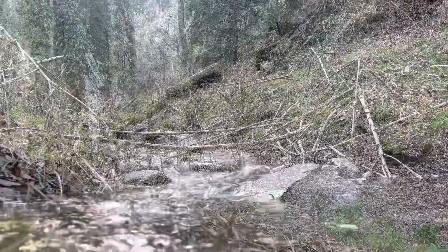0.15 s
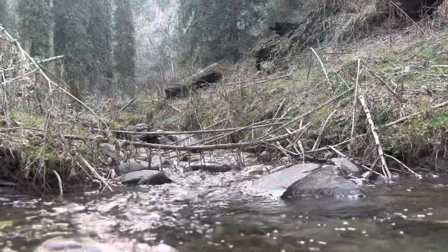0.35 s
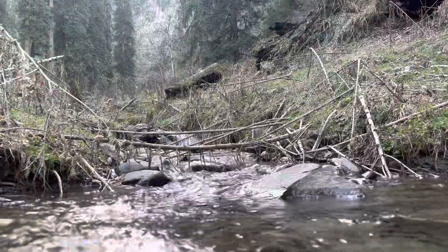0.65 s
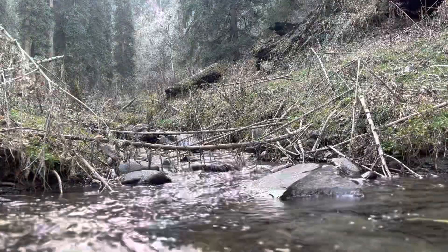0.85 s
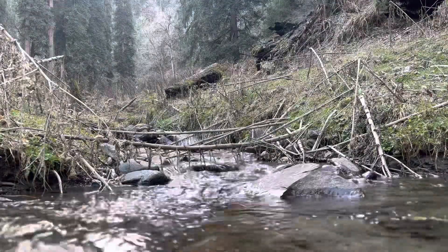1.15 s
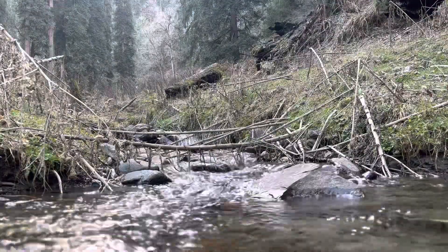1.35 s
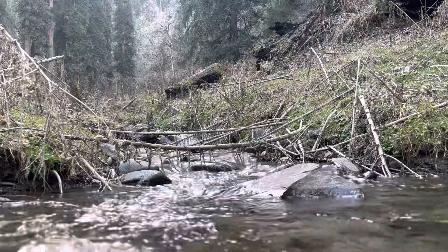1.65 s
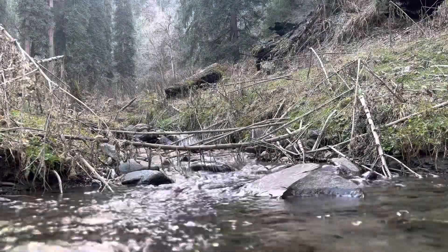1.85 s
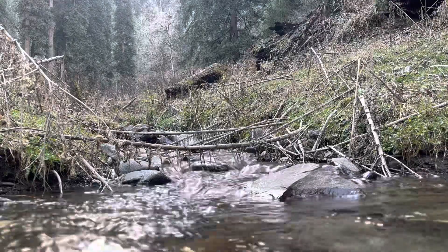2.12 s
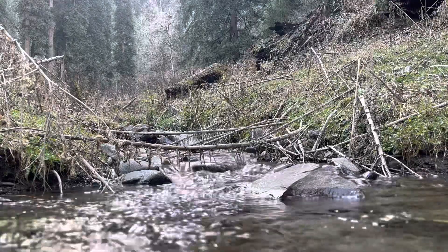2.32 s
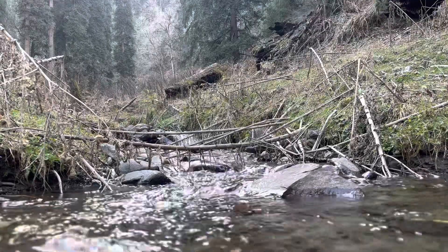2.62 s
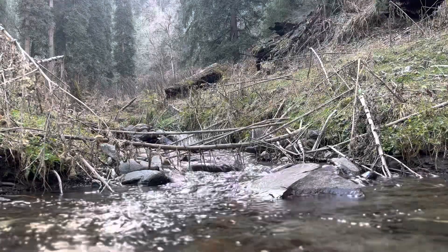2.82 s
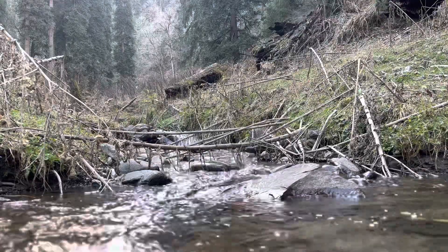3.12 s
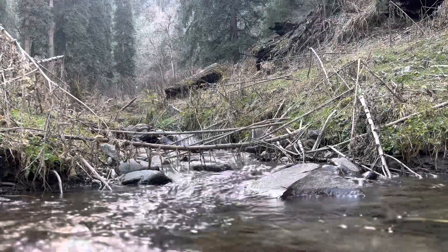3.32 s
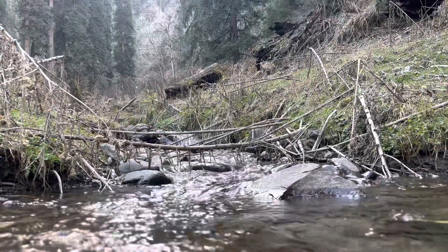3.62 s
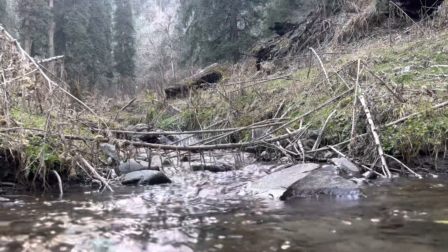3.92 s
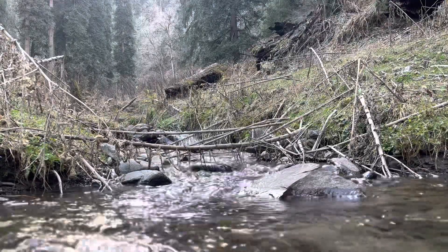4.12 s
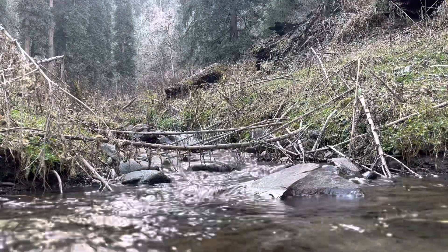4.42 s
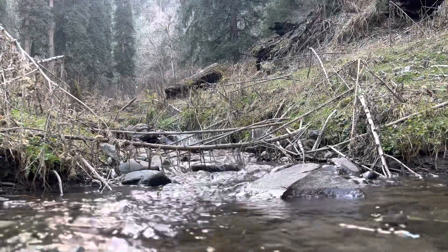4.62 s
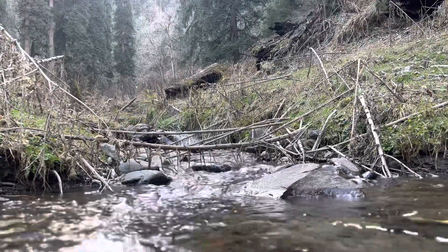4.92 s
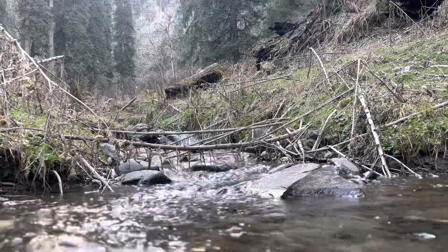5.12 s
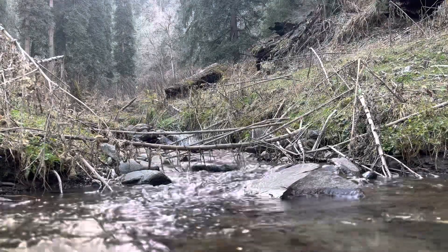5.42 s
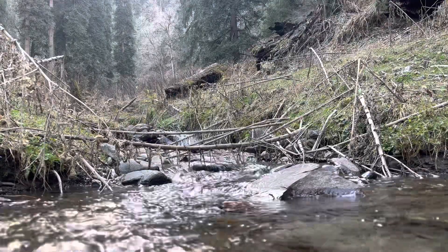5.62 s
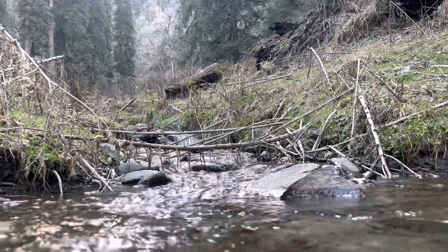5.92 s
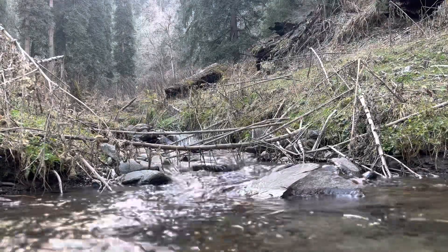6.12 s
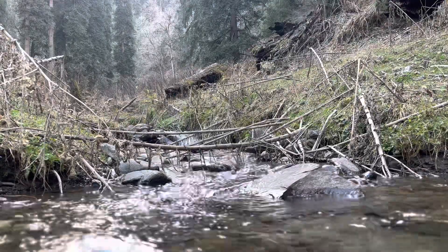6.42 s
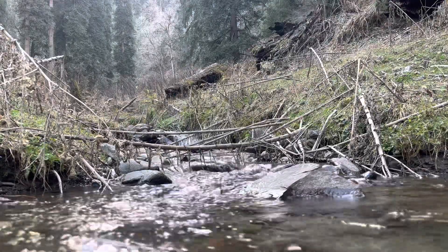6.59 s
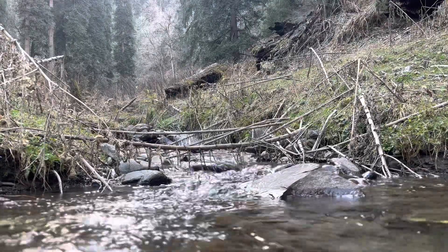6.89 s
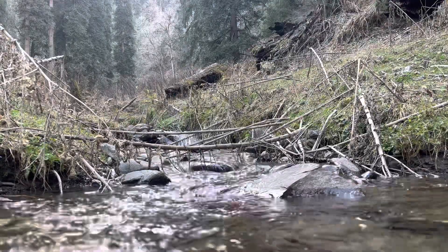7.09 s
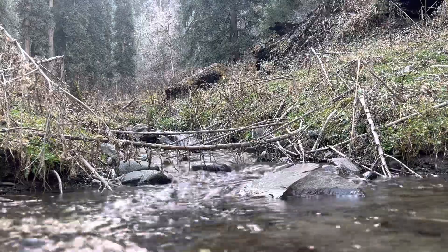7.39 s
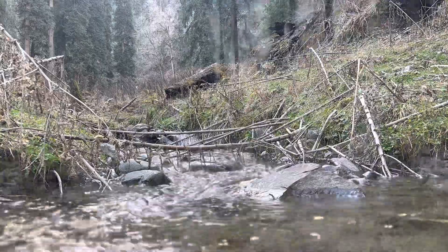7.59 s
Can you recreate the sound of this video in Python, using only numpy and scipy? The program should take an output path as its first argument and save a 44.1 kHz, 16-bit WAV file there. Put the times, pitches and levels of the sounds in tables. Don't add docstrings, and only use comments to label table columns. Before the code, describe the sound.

A shallow stream pours over rocks in a forest, captured within arm's reach by a small stereo microphone. Throughout, a low, soft wash of farther water sits under a dense fizz of tiny ringing bubbles and fine spray. It begins slightly subdued, rises over the first half second, then slowly fills out until about 5.5 s and stays steady. Isolated plops and drips come early, with a slap at 1.2 s. From 2.5 to 3.3 s it becomes busier: popping bubbles, a deep gulp near 2.9 s, small surges and a slap. Plops crowd around 4.4-4.9 s, mostly left. At 6.1 s the largest hollow plop bursts on the left, overloading briefly. A quick splashy surge hits stone at 6.85 s, then bright drips near 7 s and final plops at 7.6-7.7 s. Short rocky echoes surround the close sounds, and the flow continues to the end.

```python
import sys
import numpy as np
from scipy import signal
from scipy.fft import rfft, irfft
from scipy.io import wavfile
from scipy.ndimage import uniform_filter1d

SR = 44100
rng = np.random.default_rng(int(sys.argv[2]) if len(sys.argv) > 2 else 0)


def generate_wav(sig):
    pcm = np.round(np.clip(np.atleast_2d(sig).T, -1, 1) * 32767).astype(np.int16)
    wavfile.write(sys.argv[1], SR, pcm)


def volts(x):
    e = np.asarray(x, float) / 20
    return 10 ** e


N = 341775

# frequency in Hz, level in dB per Hz.
BUBBLE_COLOUR = [(200, -35), (400, 0.5), (800, 0), (1150, -3), (2000, -11), (2700, -8.5), (5000, -20.5),
                 (7500, -26), (10500, -29.5), (13000, -41), (15500, -52)]
# start in seconds, peak in dB, pitch in Hz, left over right in dB.
PLOPS = [(1.336, -13.5, 1426, 8), (1.882, -17.5, 1104, 13), (2.672, -20, 1070, 3), (4.278, -19, 1165, -2),
         (4.381, -22, 1000, 0), (4.395, -19.5, 1115, 8), (4.424, -18, 1203, 7), (4.497, -9.5, 1430, 16.5),
         (4.571, -20, 1380, 14), (4.601, -13.5, 1140, 12), (5.217, -21, 1210, 10), (5.488, -16, 1310, 5),
         (5.508, -21, 1200, 5), (6.641, -18.5, 1565, 11), (6.732, -15, 980, 10), (7.094, -25, 818, -13),
         (7.144, -23, 1004, -7), (.572, -20, 1140, 3), (2.251, -25, 1140, -5)]
# start in seconds, peak in dB, pitch in Hz, left over right in dB.
BIG_PLOPS = [
    (6.131, 2, 1145, 15),
]
# start in seconds, peak in dB, pitch in Hz, left over right in dB.
BLIPS = [(0.58, -18, 1620, 10), (2.319, -20, 900, 4), (2.506, -17, 1130, 2), (2.621, -28, 1030, 16),
         (2.728, -21, 1120, -6), (2.865, -16.5, 740, 2), (3.033, -21, 1187, 16), (3.234, -13, 1300, -1),
         (3.282, -15, 1210, 12), (3.801, -21.5, 980, 0), (4.181, -16, 1187, 7), (4.694, -11, 1770, 3),
         (4.727, -25, 1250, 9), (4.743, -22, 940, 11), (4.808, -19, 1247, -3), (5.072, -17.5, 1076, 6),
         (5.297, -15.5, 1180, 7), (5.787, -20.5, 1234, 9), (6.101, -15, 2350, -5), (6.784, -19, 1110, -15),
         (3.368, -18, 1100, -4), (7.552, -22, 1170, -15), (7.569, -11, 1560, 3), (7.695, -10.5, 1145, 1),
         (4.4, -19, 2450, 2), (4.422, -22, 2080, 0), (4.5605, -23, 1820, 1), (4.608, -18, 1820, -3),
         (3.559, -24, 2010, -2), (3.6616, -17, 2330, .5), (3.796, -24, 1840, -5), (5.951, -20, 1700, -2),
         (6.265, -25, 2090, -8), (6.36, -20, 1700, 1.5), (.917, -22, 1690, -1), (5.175, -25, 1740, 1.5),
         (5.046, -19, 2550, -2), (5.15, -21, 1050, 3)]


def evened(x):
    return x / np.sqrt(np.mean(x ** 2) + 1e-20)


def read(points, hz):
    f, value = np.transpose(points)
    return np.interp(np.log(hz + 1), np.log(f + 1), value)


def port(hz, axis):
    # frequency in Hz, left-right likeness from 0 to 1, right lead in radians,
    # left over right in dB.
    ports = [(0, .98, 0, 0), (170, .95, .22, 0), (330, .72, .4, -1.5), (520, .12, 1.6, -2),
             (720, .45, 3.5, -2.5), (950, .15, 6, 0), (1200, .3, 7.8, 4), (1650, .1, 7.3, 4),
             (2250, .3, 4.4, -2.5), (2800, .62, 3.8, .5), (3600, .2, 5, 5), (5000, .1, 8.8, 12),
             (6300, .12, 6.5, 3), (7700, .6, 9.2, 1), (8400, .7, 9.6, .5), (10000, .6, 11, -.5),
             (10700, .82, 12.3, 0), (12800, .85, 12.6, 0), (14000, .2, 12.7, 0)]
    return np.interp(hz, *np.transpose(ports)[[0, axis]])


def through_ports(direct, other, colour):
    hz = np.fft.rfftfreq(N, 1 / SR)
    same = np.clip(port(hz, axis=1), 0, 1)
    a, b = rfft(direct), rfft(other)
    left = a * volts(port(hz, axis=3))
    right = same * np.exp(1j * port(hz, axis=2)) * a + np.sqrt(1 - same ** 2) * b
    return evened(irfft(np.array([left, right]) * volts(read(colour, hz)), N))


def bubble(hz, t60, rise, phase, attack_cycles, hold=1.4):
    t60 = max(t60, .001)
    cycles = hz * np.arange(int(t60 * SR) + 8) / SR
    attack = 1 - np.exp(-cycles / attack_cycles)
    shape = attack * volts(-60 * (cycles / hz / t60) ** hold)
    return shape / shape.max() * np.sin(2 * np.pi * cycles * (1 + rise * cycles) + phase)


def wash(patchy_db=1.5):
    # frequency in Hz, level in dB per Hz.
    wash_colour = [(22, -46), (40, -13), (58, -1.5), (130, 1), (300, -1.5), (450, -7.5), (650, -10.5),
                   (1100, -9), (2000, -17), (2600, -20), (3500, -24.5), (5500, -33.5), (8000, -33.5),
                   (10500, -34), (13000, -44), (15500, -72)]
    a, b, c, d, patches = rng.standard_normal((N // 128 + 8, 257, 5)).T
    patches = uniform_filter1d(patches, size=10, axis=0)
    patches = evened(uniform_filter1d(patches, size=12, axis=1))
    z = np.array([a + 1j * b, c + 1j * d]) * volts(patchy_db * patches)
    fields = signal.istft(z, nperseg=512, noverlap=384)[1][:, :N]
    return through_ports(*fields, wash_colour)


def banks(x, t60=0.2, first_s=.006):
    t = np.arange(SR // 8) / SR
    signs = rng.choice([-1., 1.], (2, len(t)))
    taps = signs * (rng.random((2, len(t))) < 1500 / SR) * (t > first_s)
    taps *= volts(-60 * t / t60)
    taps /= np.linalg.norm(taps, axis=1)[:, None]
    return signal.oaconvolve(x, taps, axes=1)[:, :N]


def spray(per_s=220, spread_db=3.0, splash_db=-9):
    # frequency in Hz, level in dB per Hz.
    spray_colour = [(600, -39), (1500, 14.5), (3000, -17), (5000, -16), (8000, -11), (11000, -9.5),
                    (13000, -11.5), (15500, -26)]
    burst_s, splash_s = .0005, .002
    size = volts(spread_db * np.minimum(rng.exponential(1, N), 3)) * (rng.random(N) < per_s / SR)
    away_s = abs(np.arange(-400, 400)) / SR
    puffs = signal.oaconvolve(size, np.exp(-away_s / burst_s), "same")
    loose = through_ports(*puffs * rng.standard_normal((2, N)), spray_colour)
    s, db = np.transpose(PLOPS + BLIPS + BIG_PLOPS)[:2]
    starts = np.zeros(N)
    starts[(s * SR).astype(int) + 90] = volts(np.minimum(db, -6) + splash_db)
    splash_shape = signal.oaconvolve(starts, np.exp(-away_s / splash_s), "same")
    return loose, splash_shape * through_ports(*rng.standard_normal((2, N)), BUBBLE_COLOUR)


def bubbles(per_s, spread_db, cycles, clump_db, lo_hz, hi_hz, attack_cycles, count):
    drift = uniform_filter1d(rng.standard_normal(N), size=900)
    clumps = volts(clump_db * evened(uniform_filter1d(drift, size=700)))
    size = volts(spread_db * np.minimum(rng.exponential(1, N), 3.5))
    size = size * (rng.random(N) < per_s / SR) * clumps
    kind = rng.integers(0, count, N)
    luck = rng.random((count, 4))
    fields = np.zeros((2, N))
    for k, hz in enumerate(np.geomspace(lo_hz, hi_hz, count)):
        t60 = cycles * (0.5 + 1.9 * luck[k, 0]) / hz
        rise = 0.1854 * luck[k, 1] / cycles
        turns = (0, 2 * np.pi * luck[k, 2])
        pair = np.array([bubble(hz, t60, rise, turn, attack_cycles) for turn in turns])
        pair *= np.sqrt(hz) / np.linalg.norm(pair[0])
        rung = signal.oaconvolve((size * (kind == k))[None], pair, axes=1)[:, :N]
        lag = int(40 * luck[k, 3]) - 20
        fields += [rung[0], np.roll(rung[1], lag)]
    z = rfft(fields)
    power = uniform_filter1d(abs(z) ** 2, size=1500, axis=1)
    floor = 0.22 * np.median(power[:, round(lo_hz * N / SR):round(hi_hz * N / SR)])
    return through_ports(*irfft(z / np.sqrt(power + floor), N), BUBBLE_COLOUR)


def fizz(gurgle_db=-7.5):
    short = bubbles(per_s=6000, spread_db=2.6, cycles=13.9, clump_db=2.8,
                    lo_hz=281.1, hi_hz=13100, attack_cycles=5.0, count=34)
    long = bubbles(per_s=300, spread_db=3.2, cycles=24, clump_db=4,
                   lo_hz=330, hi_hz=2400, attack_cycles=3.5, count=18)
    return short + volts(gurgle_db) * long


def strays(db, spread_db, lo_hz, hi_hz, count):
    when, size, pitch = rng.random((count, 3)).T
    peak_db = db + spread_db * (2 * size - 1)
    return list(zip(when * (N - 1) / SR, peak_db, lo_hz * (hi_hz / lo_hz) ** pitch))


def add(mix, s, db, hz, t60, pan_db, rise, attack_cycles, hold=1.4):
    for side, sign, phase in zip(mix, (.5, -.5), (0, port(hz, axis=2))):
        sound = volts(db + sign * pan_db) * bubble(hz, t60, rise, phase, attack_cycles, hold)
        part = side[round(s * SR):][:len(sound)]
        part += sound[:len(part)]


def near_water():
    # start in seconds, peak in dB, pitch in Hz,
    # t60 in seconds, left over right in dB.
    gulps = [(.99, -21.5, 352, .059, -2), (1.625, -21, 233, 0.05, -3), (2.56, -13, 600, 0.02, 9),
             (2.571, -20, 1293, 0.046, 8), (2.622, -19.5, 610, 0.02, 12), (2.869, -6.5, 470, 0.025, 0),
             (2.905, -18, 633, 0.066, 2), (2.935, -27, 823, .061, 14), (4.512, -14, 1300, 0.017, 15),
             (4.527, -22, 1410, 0.04, 10), (4.612, -26, 1160, .08, 5), (5.217, -14.5, 580, 0.038, 8),
             (5.24, -20, 720, 0.049, 9), (5.346, -23, 251, 0.049, -1), (4.498, -21, 1550, 0.02, 17),
             (1.334, -24, 1220, .03, 5), (4.591, -19, 1405, .04, 11), (6.152, -21, 1900, 0.027, 11),
             (6.836, -16, 1900, 0.029, 16), (6.838, -19.5, 466, 0.048, 5), (1.349, -21.5, 1440, 0.036, 7),
             (4.841, -22, 2190, 0.028, -7), (2.755, -16, 724, 0.034, -5), (3.222, -17, 603, .03, -2),
             (3.907, -23, 538, 0.036, -2), (4.812, -19, 830, 0.025, 0), (4.914, -22, 604, .03, -2),
             (5.073, -23, 517, .03, 0), (5.668, -30, 484, .04, -5), (6.121, -19, 590, .03, -4),
             (6.218, -23, 552, 0.037, -7), (7.246, -21, 670, .03, -9), (7.561, -28, 454, .04, -5),
             (7.693, -28, 528, .04, -5), (2.884, -20, 313, 0.037, 0), (2.862, -18, 200, 0.04, -2),
             (2.9, -22.5, 230, 0.066, 0), (4.62, -23, 1110, .05, 8)]
    # start in seconds, peak in dB, pitch in Hz,
    # t60 in seconds, left over right in dB.
    bursts = [(2.559, -7, 1150, 0.0041, 16), (2.5636, -5.5, 1286, 0.007, 17.5),
              (6.1488, -15, 1400, .007, 2), (6.1513, -10, 1150, .007, 11), (6.154, -21, 1340, 0.014, -3),
              (6.1637, -16, 1120, .014, 12), (6.183, -15, 1000, 0.019, 14), (6.8355, -13, 1585, 0.015, 16),
              (6.8358, -17, 1190, .012, 15), (7.353, -14.5, 2260, 0.012, -10)]
    # start in seconds, peak in dB, pitch in Hz.
    drips = [(0.2402, -20.5, 3940), (0.653, -20.5, 3640), (1.4145, -19, 4480), (1.496, -16.5, 3160),
             (2.155, -22, 3700), (2.7551, -24, 3200), (3.299, -12.5, 2680), (3.3226, -21, 4550),
             (3.3628, -20, 3710), (3.692, -16.5, 5240), (3.7848, -23, 4300), (3.9295, -20, 3230),
             (4.1764, -21, 3200), (4.3042, -16.5, 4540), (4.883, -14, 3050), (5.0454, -29, 3630),
             (5.3298, -21, 3630), (5.408, -17.5, 3640), (5.7004, -21, 3400), (6.3614, -19, 3130),
             (6.832, -23, 3730), (6.8526, -19, 3580), (6.975, -14, 4260), (7.0009, -10.5, 2800),
             (7.1701, -21.5, 4890), (7.193, -13.5, 3200), (7.228, -20, 4900), (7.266, -17.5, 4500),
             (7.5657, -21, 3820), (7.624, -21, 3870)]
    # start in seconds, peak in dB, centre in Hz.
    slaps = [(0.579, -14, 1200), (.8397, -22, 5770), (1.163, -11.5, 4600), (1.302, -20, 5550),
             (1.4132, -16, 4970), (2.7553, -18, 1070), (2.866, -14, 1700), (2.9344, -26, 1290),
             (3.056, -14, 4200), (3.0995, -20, 4000), (3.243, -5, 1290), (4.7255, -6.5, 1510),
             (4.8449, -12, 5200), (4.897, -12, 3400), (5.048, -13, 3900), (6.8326, -14, 5000),
             (6.853, -6, 2400), (6.866, -5.5, 3320), (6.8705, -18, 6500), (6.898, -17, 4200),
             (7.568, -21, 1460), (2.948, -15, 2600), (6.785, -10, 1300), (2.6207, -15, 1060),
             (7.6948, -8, 1190), (5.073, -16, 1100)]
    # start in seconds, peak in dB, centre in Hz.
    ticks = [(0.596, -21, 11800), (1.3818, -18.5, 6710), (1.979, -20, 7040), (2.5055, -18.5, 10300),
             (2.7556, -26, 10400), (3.0375, -21, 11500), (3.1283, -24, 10700), (3.5274, -22, 11000),
             (3.567, -19, 9200), (3.6436, -22, 7210), (3.6731, -22, 7310), (4.0013, -22.5, 10000),
             (4.2195, -21, 6590), (4.4418, -24, 6610), (4.7247, -23.5, 10400), (4.7935, -21, 7280),
             (4.8444, -20, 10800), (4.874, -18, 9600), (5.4255, -18, 6550), (5.7344, -21, 9870),
             (6.0921, -22, 6600), (6.137, -9, 9800), (6.3759, -17, 10300), (6.538, -23, 10900),
             (6.8304, -18, 7050), (6.8526, -20, 10600), (6.8832, -13, 10400), (7.192, -22, 6590),
             (7.214, -22, 10900), (7.2279, -18, 9200), (1.382, -21, 10500), (1.9786, -21.5, 10500),
             (.8056, -26, 6770), (1.0266, -27, 10300), (1.9021, -31, 10400), (2.4603, -25, 9200),
             (3.0694, -26, 10100), (3.4032, -22, 7350), (3.6376, -25, 10000), (3.6734, -24, 10500),
             (3.6438, -24, 10500), (4.3385, -26, 10300), (4.534, -24, 9800), (4.9038, -27, 10000),
             (5.005, -26, 10000), (5.177, -25, 10700), (5.2834, -32, 10300), (5.4066, -27, 10500),
             (5.871, -27, 10500), (5.984, -27, 12500), (6.0462, -25, 11200), (6.3071, -28, 12000),
             (6.3949, -28, 11000), (6.513, -25, 11100), (6.8104, -29, 9800), (7.0364, -29, 9800),
             (7.2639, -25, 10000), (6.8311, -21, 10500)]
    plop_t60_s, big_t60_s, blip_cycles = 0.032, .042, 19.3
    gulp_rise, big_gulp_rise = 0.0028, -0.0423
    lead_s, tick_lag_s = .0008, .0008
    mix = np.zeros((2, N))
    rings = [(*row, plop_t60_s) for row in PLOPS]
    rings += [(*row, big_t60_s) for row in BIG_PLOPS]
    rings += [(*row, blip_cycles / row[2]) for row in BLIPS]
    for s, db, hz, pan_db, t60 in rings:
        attack_cycles = 1 if db > -9.5 else 4
        add(mix, s - lead_s * attack_cycles ** .5, db, hz, t60, pan_db, .0005, attack_cycles)
    for s, db, hz in strays(-25.5, 6, 858, 1400, count=6):
        add(mix, s, db, hz, blip_cycles / hz, port(hz, axis=3), gulp_rise, 4)
    for row in bursts:
        add(mix, *row, rise=.0005, attack_cycles=.7, hold=3.5)
    largest_db = max(row[1] for row in gulps)
    for row in gulps:
        rise = big_gulp_rise if row[1] == largest_db else gulp_rise
        add(mix, *row, rise, attack_cycles=2.2)
    for s, db, hz in drips + strays(-42.5, 8, 3300, 4600, count=6):
        add(mix, s, db, hz, t60=.005, pan_db=port(hz, axis=3) + 3, rise=.002, attack_cycles=2.4)
    for s, db, hz in slaps:
        add(mix, s + tick_lag_s, db, hz, 4.5 / hz, port(hz, axis=3), rise=0, attack_cycles=.6)
    for s, db, hz in ticks + strays(-34, 5, 6500, 11500, count=18):
        add(mix, s + tick_lag_s, db, hz, t60=.0012, pan_db=3.5, rise=0, attack_cycles=1.5)
    return mix


def scene():
    # time in seconds, level in dB.
    slow_level = [(0.0, -9), (0.15, -5.5), (0.58, -3.5), (1.42, -2.5), (3.6, -0.5), (4.0, -0.5), (5.44, 0),
                  (6.06, 0), (7.75, 0)]
    # centre in seconds, extra level in dB, half length in seconds.
    surges = [(2.923, 3.5, 0.074), (3.193, 3, 0.053), (6.844, 7, 0.028)]
    t = np.arange(N) / SR
    slow_db = np.interp(t, *np.transpose(slow_level))
    loose, splashes = spray()
    far = volts(-22.5 + 1.11 * slow_db) * wash()
    surge_db = sum(db * np.exp(-((t - s) / half_s) ** 2) for s, db, half_s in surges)
    rush = volts(-27 + 1.12 * slow_db + surge_db) * (fizz() + volts(-10.5) * loose)
    near = near_water() + splashes
    return far + rush + near + volts(-13) * banks(near)


def joint_stereo(x):
    # frequency in Hz, level in dB.
    weakest = [(6900, -30), (7300, -10), (7900, -6), (8650, -6), (9300, -9.5), (10600, -8.5), (12500, -11),
               (13500, -12.5), (15500, -13.5)]
    offset = 692
    pair = np.roll(np.array([x[0] + x[1], x[0] - x[1]]) / 2, -offset, axis=1)
    hz, _, z = signal.stft(pair, SR, nperseg=2048, noverlap=1024)
    power = abs(z[:, :1024]) ** 2
    bands = np.repeat(power.reshape(2, 32, 32, -1).mean(2), 32, axis=1)
    centre_hz = np.repeat(hz[16:1024:32], 32)
    near_9k = power[:, 420:460].sum(0).mean(0)
    near_9k = np.exp(uniform_filter1d(np.log(near_9k + 1e-20), size=30))
    kept = bands > volts(2 * read(weakest, centre_hz))[:, None] * near_9k
    kept = kept | (hz[:1024, None] < weakest[0][0])
    kept |= power[:, 420:600].sum(0).mean(0) > 1.5 * near_9k
    z = z * np.pad(kept, ((0, 0), (0, 1), (0, 0)))
    pair = signal.istft(z, SR, nperseg=2048, noverlap=1024)[1][:, :N]
    mid, side = np.roll(pair, offset, axis=1)
    return np.array([mid + side, mid - side])


def roll_off(x):
    return signal.sosfilt(signal.butter(12, 15800, fs=SR, output="sos"), x)


def record(dry):
    overloaded = np.clip(dry, -1, 1)
    mix = np.clip(joint_stereo(overloaded), -1, 1)
    return roll_off(mix)


dry = scene()
out = record(dry)
generate_wav(out)
```